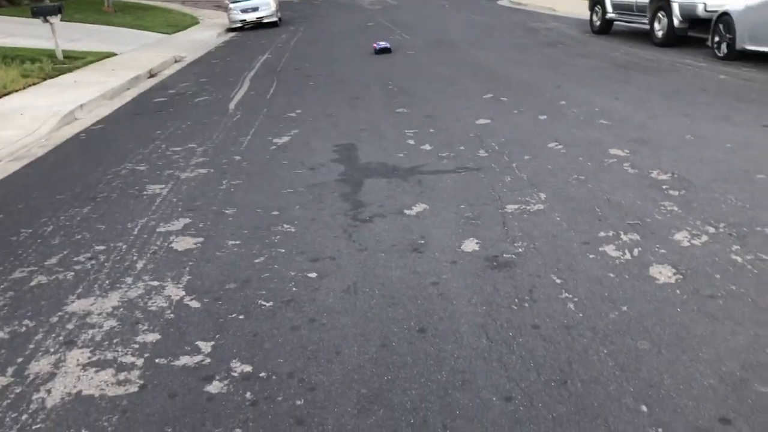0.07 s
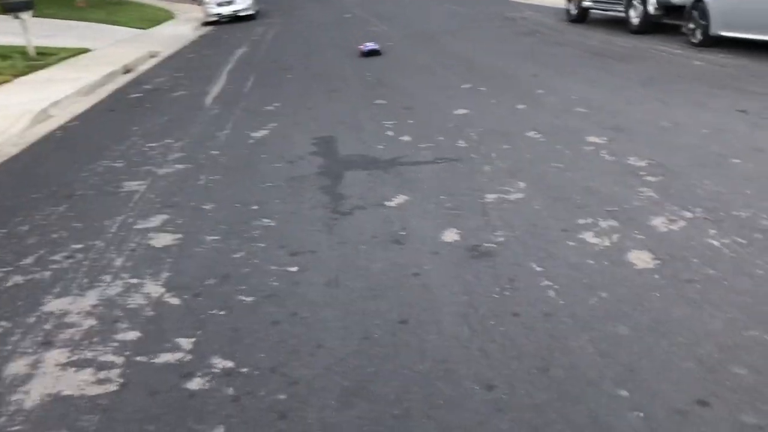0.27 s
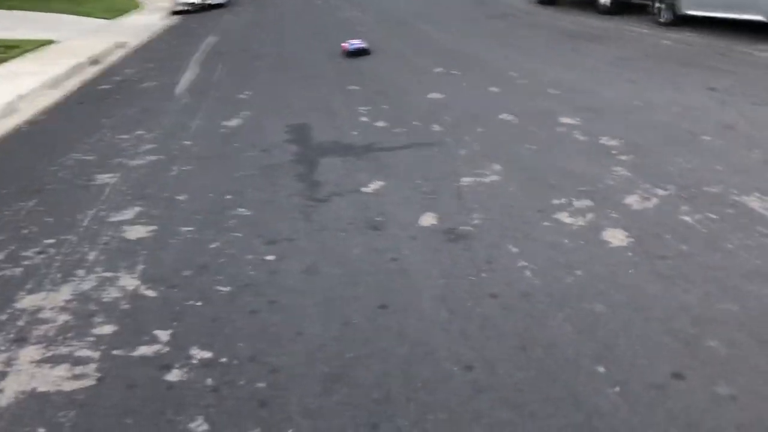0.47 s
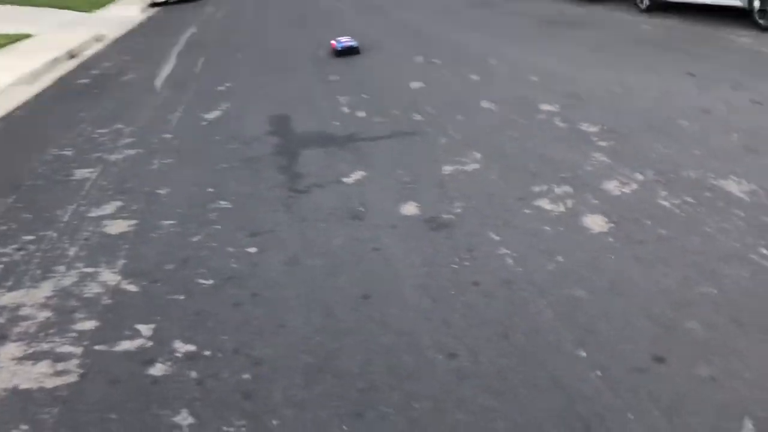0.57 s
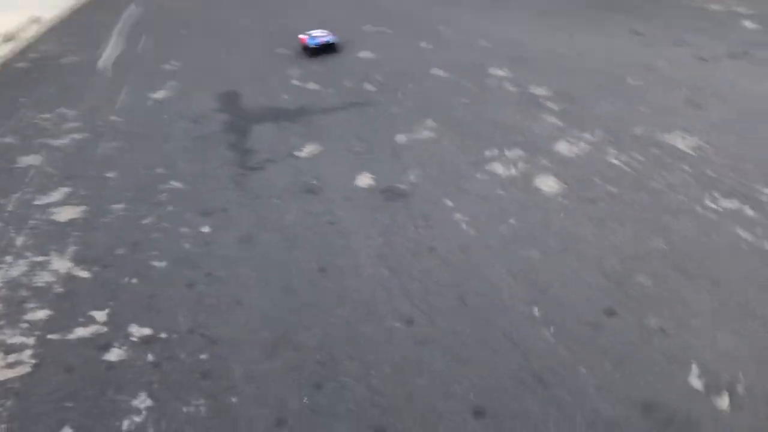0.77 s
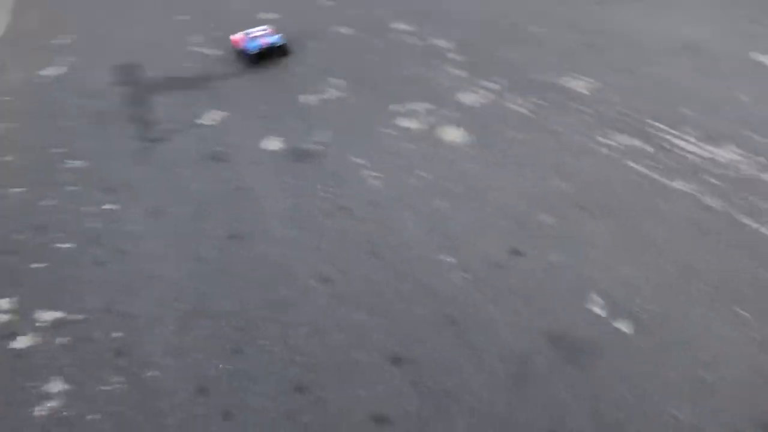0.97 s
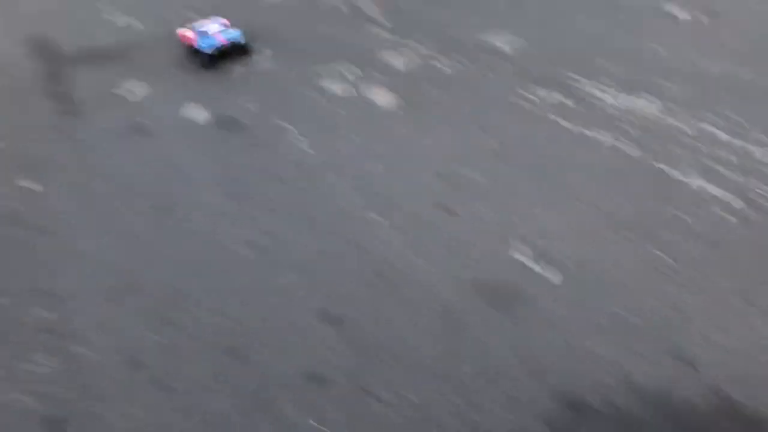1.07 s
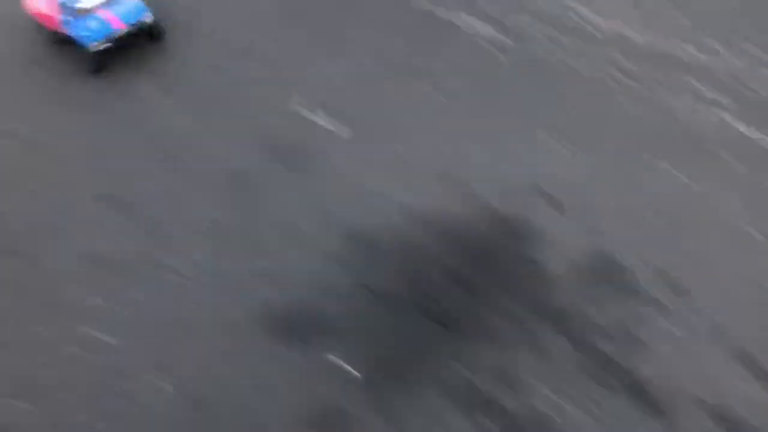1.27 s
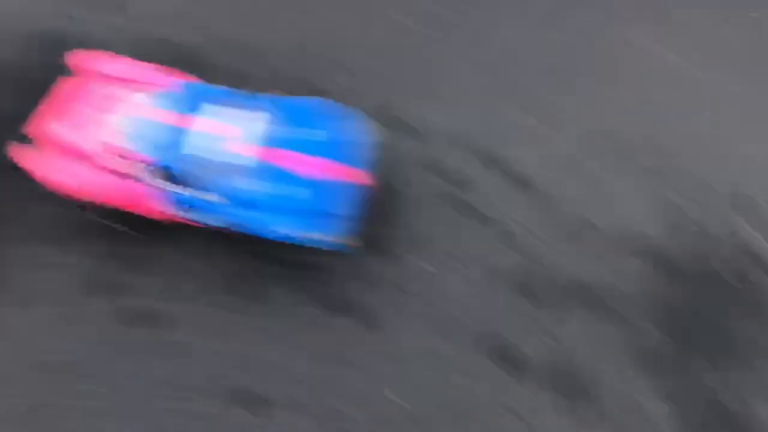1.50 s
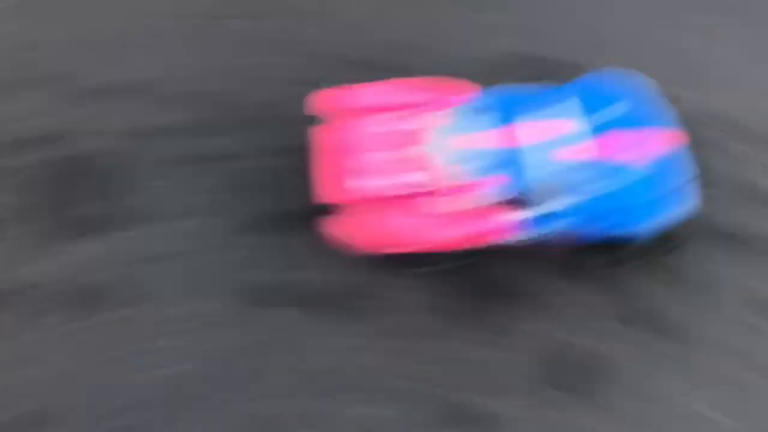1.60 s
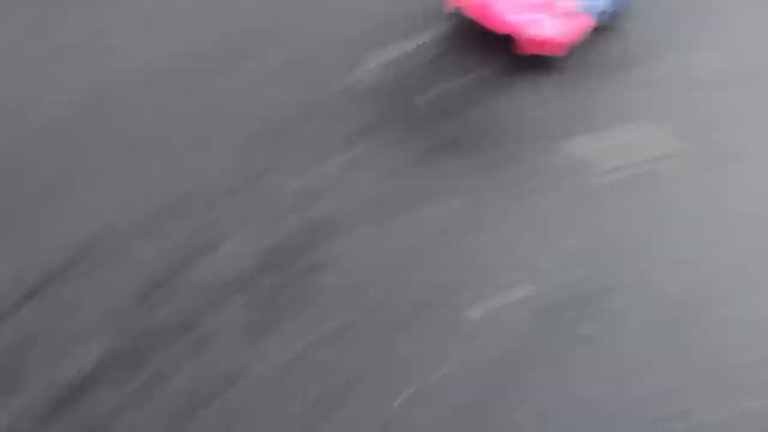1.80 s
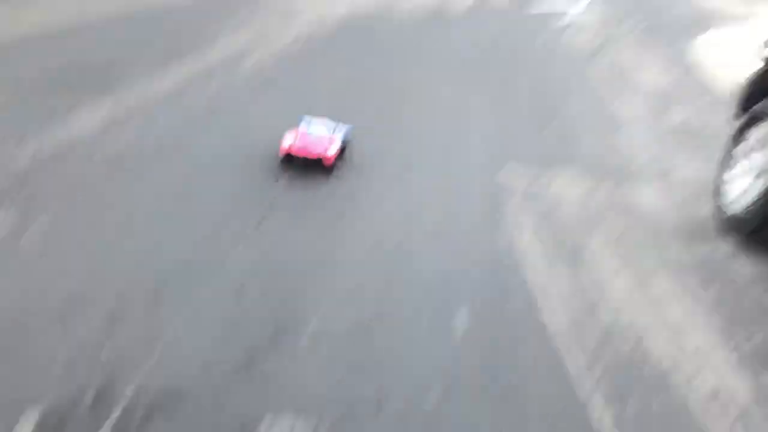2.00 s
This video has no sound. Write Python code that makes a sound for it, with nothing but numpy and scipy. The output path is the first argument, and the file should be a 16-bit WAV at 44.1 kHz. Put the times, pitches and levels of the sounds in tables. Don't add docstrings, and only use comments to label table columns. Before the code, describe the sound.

A small electric remote-control truck approaches on an asphalt street, its thin high gear whine and tyre hiss growing, stones clicking on plastic, then whips past a handheld microphone with wind thumps and fades.

```python
import sys
import numpy as np
from scipy import signal
from scipy.io import wavfile
from scipy.ndimage import uniform_filter1d

SR = 44100
rng = np.random.default_rng(int(sys.argv[2]) if len(sys.argv) > 2 else 0)


def gain_from_db(level_db):
    decades = np.asarray(level_db, float) / 20
    return 10 ** decades


def log_audio(samples):
    frames = np.atleast_2d(samples).T
    limited = np.clip(frames, -1, 1)
    pcm = np.round(limited * 32767).astype(np.int16)
    wavfile.write(sys.argv[1], SR, pcm)


N = 90404


def evened(x):
    return x / np.sqrt(np.mean(x ** 2) + 1e-20)


def curve(table, col):
    rows = np.array(table, float)
    return np.interp(np.arange(N) / SR, rows[:, 0], rows[:, col])


def read_colour(points, hz):
    f, value = np.transpose(points)
    return np.interp(np.log(hz + 1), np.log(f + 1), value)


def smoothed_noise(seconds):
    span = max(int(seconds * SR), 2)
    once = uniform_filter1d(rng.standard_normal(N), span)
    return evened(uniform_filter1d(once, span))


def resonate(x, hz, width_hz):
    turn = np.exp(2j * np.pi * np.cumsum(hz * np.ones(len(x))) / SR)
    r = np.exp(-np.pi * width_hz / SR)
    ringing = signal.lfilter([(1 - r) ** 2], [1, -2 * r, r * r], x / turn)
    return 2 * (turn * ringing).real


def rumble(x, top_hz):
    low_pass = signal.butter(4, np.clip(top_hz, 30, 5000), fs=SR, output="sos")
    return evened(signal.sosfilt(low_pass, x))


# time_s, level_db, gearbox_db
DRIVE_PAST = [(0, -44, -4), (.2, -45, -1.5), (.47, -43, 1.5), (.72, -41, -5), (.85, -40, -3.5),
              (1.28, -35.5, -2), (1.49, -30, -5), (1.59, -27.5, 0.5), (1.63, -26.5, 11.5),
              (1.68, -25.5, -4), (1.708, -24.5, 11.5), (1.73, -28.5, 6.5), (1.76, -26, 8.5),
              (1.81, -26, -1), (1.88, -29, 7.5), (1.93, -29.5, -5.5), (1.98, -36, -0.5), (2.05, -38, -7)]
FAR_DB, NEAR_DB = -46, -27


def nearness():
    level_db = np.maximum.accumulate(curve(DRIVE_PAST, col=1))
    return np.clip((level_db - FAR_DB) / (NEAR_DB - FAR_DB), 0, 1)


def leaving():
    passed_s, fade_s = 1.7, .27
    return np.clip((np.arange(N) / SR - passed_s) / fade_s, 0, 1)


def staged(*dbs):
    midway = .33
    return gain_from_db(np.interp(nearness() + leaving(), [0, midway, 1, 2], dbs))


# time_s, pitch_hz
GEAR_WHINE = [(0, 7040), (.13, 7065), (.39, 7165), (.65, 7222), (.91, 7286), (1.17, 7333), (1.3, 7345),
              (1.5, 7320), (1.6, 7270), (1.7, 7170), (1.85, 7050), (2.05, 7000)]


def mesh_pitch():
    return curve(GEAR_WHINE, col=1)


# time_s, peak_db, length_s, top_hz
WIND_PUFFS = [(0.036, -42.5, 0.077, 189), (.16, -41, 0.063, 148), (0.216, -45, 0.083, 252),
              (0.274, -39.5, 0.032, 101), (0.551, -37, 0.013, 300), (0.613, -37, 0.044, 193),
              (0.683, -38, 0.056, 240), (0.771, -40.5, 0.021, 195), (.86, -43, 0.05, 148),
              (0.959, -39, .03, 253), (1.09, -43.5, .04, 150), (1.254, -29.5, 0.019, 249),
              (1.266, -22, 0.014, 485), (1.275, -23, 0.031, 147), (1.43, -39.5, 0.078, 121),
              (1.58, -35, 0.065, 150), (1.631, -22.5, 0.043, 400), (1.649, -22, 0.02, 178),
              (1.672, -24, 0.025, 149), (1.755, -19.5, 0.016, 460), (1.779, -26.5, 0.057, 200),
              (1.80, -26, 0.035, 275), (1.827, -31.5, 0.037, 270), (1.89, -27.5, 0.026, 250),
              (1.961, -25, .04, 287), (2.025, -27, 0.015, 284)]
BREEZE_DB, BREEZE_HZ = -54.5, 108
WAKE_DB, WAKE_HZ, WAKE_LAG_S = -7, 324, 0.14


def wind():
    t = np.arange(N) / SR
    breeze = gain_from_db(BREEZE_DB + 1.9 * smoothed_noise(0.019)) * rumble(rng.standard_normal(N), BREEZE_HZ)
    late_db = np.interp(t - WAKE_LAG_S, t, curve(DRIVE_PAST, col=1))
    wake_db = 2.2 * (late_db - NEAR_DB) + NEAR_DB + WAKE_DB + 2 * smoothed_noise(0.026)
    out = breeze + gain_from_db(wake_db) * rumble(rng.standard_normal(N), WAKE_HZ)

    lead_s = .08
    noise = rng.standard_normal((len(WIND_PUFFS), SR // 4))
    puff_t = np.arange(SR // 4) / SR - lead_s
    for (time_s, peak_db, length_s, top_hz), air in zip(WIND_PUFFS, noise):
        u = puff_t / length_s
        shape = np.exp(-np.where(u < 0, 8 * u ** 2, 1.77 * u))
        puff = shape * (rumble(air, top_hz) - 1.1 * rumble(air, 0.58 * top_hz))
        puff = puff * np.sqrt(np.sum(shape ** 2) / np.sum(puff ** 2))
        out = out + gain_from_db(peak_db) * np.interp(t, time_s + puff_t, puff, 0, 0)
    return out


# time_s, peak_db, pitch_hz
STONE_HITS = [
    (0.607, -37, 6400),
    (.642, -34, 6550),
    (.88, -33, 6700),
    (.995, -36, 6550),
    (1.224, -26, 6560),
    (1.445, -24.5, 520),
    (1.474, -16.5, 7450),
]


def stones():
    out, t = np.zeros(N), np.arange(2000) / SR
    attack_s, fade_60db_s = 0.0027, 0.029
    noise = rng.standard_normal((len(STONE_HITS), 2000))
    for (time_s, peak_db, hz), air in zip(STONE_HITS, noise):
        ring = evened(resonate(air, hz, .09 * hz + 60))
        ring = ring * np.minimum(t / attack_s, 1) * gain_from_db(peak_db - 60 * t / fade_60db_s)
        out[round(time_s * SR):][:2000] += ring
    return out


def grit():
    clicks_per_s, size_db = 5000, 1.5
    size = gain_from_db(size_db * np.minimum(rng.exponential(1, N), 4))
    size = size * (rng.random(N) < clicks_per_s / SR)
    clicks = evened(size * rng.choice([-1., 1.], N))
    flicker = gain_from_db(0.76 * smoothed_noise(.012))
    return evened(clicks + rng.standard_normal(N)) * flicker


# pitch_hz, level_db
FAR_HISS = [(300, -8), (700, -4), (1100, -4.5), (2400, -6.5), (4900, -8.5), (7000, -8), (8500, -17.5),
            (15600, -26)]
# pitch_hz, level_db
NEAR_HISS = [(150, -26), (250, -4), (1830, -9.5), (2770, -12.5), (3650, -10), (6130, -13), (7160, -4.5),
             (8520, -16), (15600, -19)]
# pitch_hz, level_db
GONE_HISS = [(150, -22), (250, -7.5), (980, -15), (1320, -12.5), (2450, -21), (3410, -13.5), (4810, -21),
             (7160, -18.5), (15600, -26.5)]
# pitch_hz, far_db, midway_db, near_db, leaving_db
BODY_RINGS = [(588, -11, -51, -8.5, -50), (1436, -9, -12, -28, -9.5), (3234, -8.5, -20.5, -15, -22),
              (3620, -28, -37, -15, -19), (3970, -3, -36, -26, -25), (5470, -18, -24, -27, -38),
              (8440, -34, -19, -31.5, -39), (9350, -35, -15, -45.5, -45), (12480, -28, -29, -16, -12),
              (14500, -34, -31, -23, -17.5)]
HISS_DB = -2
PATCH_DB, NEAR_PATCH_DB = 0.71, 1.2


def tyres():
    drive, mesh = grit(), mesh_pitch()
    hz, t, spectrum = signal.stft(drive, SR, nperseg=512, noverlap=384)
    near = np.interp(t * SR, np.arange(N), nearness())
    gone = np.interp(t * SR, np.arange(N), leaving())
    far, close, away = (read_colour(s, hz)[:, None] for s in (FAR_HISS, NEAR_HISS, GONE_HISS))

    def balanced(colour):
        middle = colour[26:73]
        return colour / np.sqrt((middle ** 2).sum(0) / len(hz))

    colour = balanced(gain_from_db(far + (close - far) * near)) * (1 - gone) + balanced(gain_from_db(away)) * gone
    patches = rng.standard_normal(spectrum.shape[::-1])
    patches = evened(uniform_filter1d(uniform_filter1d(patches, 12, 0), 6, 1)).T
    patches = patches * np.minimum(hz / 3500, 1)[:, None]
    patchy = gain_from_db((PATCH_DB + NEAR_PATCH_DB * near ** 2) * patches)
    hiss = signal.istft(spectrum * colour * patchy, SR, nperseg=512, noverlap=384)[1][:N]

    doppler = mesh / np.maximum.accumulate(mesh)
    shell = np.zeros(N)
    for f, *dbs in BODY_RINGS:
        ring = evened(resonate(drive, f * doppler, 7.6 * np.sqrt(f)))
        shell += staged(*dbs) * gain_from_db(PATCH_DB * smoothed_noise(0.015)) * ring
    return gain_from_db(HISS_DB) * hiss + shell


def tones(hz, orders, table):
    wobble = (.0012 + .003 * nearness() ** 2) * smoothed_noise(0.0037)
    turns = np.cumsum(hz * (1 + wobble)) / SR
    out = np.zeros(N)
    for order, dbs in zip(orders, table):
        swell = gain_from_db(2.2 * (1 + nearness() ** 2) * smoothed_noise(.04))
        sine = np.sqrt(2) * np.sin(2 * np.pi * (order * turns + rng.random()))
        out += staged(*dbs) * swell * sine
    return out


SHAFT_MULTIPLES = (1, 19, 19.54, 20, 20.44, 21, 34, 40)
# far_db, midway_db, near_db, leaving_db
SHAFT_LOUDNESS = [(-24, -14, -24, -37), (-23, -29, -20, -10), (-17.5, -20, -29, -5), (-11, -6.5, -6, -10),
                  (-20.5, -35.5, -23, -8), (-31, -14, -18, -13), (-29, -39, -25, -29),
                  (-31.5, -21, -14, -21)]
TEETH = 20


def gearbox():
    mesh = mesh_pitch()
    housing_hz, width_hz, rattle_db = 7120, 400, -6
    rattle = evened(resonate(grit(), housing_hz * (mesh / 7200) ** .5, width_hz))
    whine = tones(mesh / TEETH, SHAFT_MULTIPLES, SHAFT_LOUDNESS)
    return gain_from_db(curve(DRIVE_PAST, col=2)) * (whine + gain_from_db(rattle_db) * rattle)


AXLE_MULTIPLES = (1, 2, 3, 5)
# far_db, midway_db, near_db, leaving_db
AXLE_LOUDNESS = [(-13, -14, -18, -17), (-22.5, -17.5, -7.5, -28), (-14.5, -17, -14.5, -23.5),
                 (-22, -23, -39, -36)]
AXLE_RATIO = .2559


def axle_gears():
    return tones(mesh_pitch() * AXLE_RATIO, AXLE_MULTIPLES, AXLE_LOUDNESS)


def truck():
    return gain_from_db(curve(DRIVE_PAST, col=1)) * (tyres() + gearbox() + axle_gears())


def scene():
    return (wind() + stones() + truck())[None]


def top_cut(x):
    return signal.sosfilt(signal.butter(12, 16350, fs=SR, output="sos"), x)


def record(dry):
    low_cut_hz, overload, top_hz = 47.3, 0.57, 15690
    low_cut = signal.butter(5, low_cut_hz, "high", fs=SR, output="sos")
    cut = signal.sosfilt(low_cut, dry)
    soft = overload * np.tanh(cut / overload)
    band_limit = signal.firwin(2047, top_hz, window=("kaiser", 9), fs=SR)
    mix = signal.oaconvolve(soft, band_limit[None], "same")
    return top_cut(mix)


dry = scene()
out = record(dry)
log_audio(out)
```